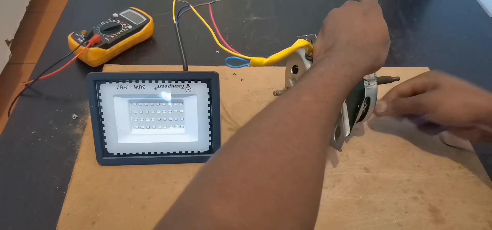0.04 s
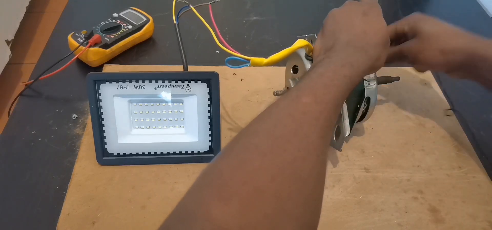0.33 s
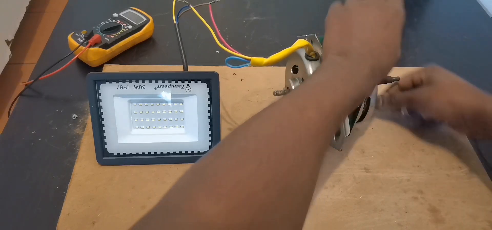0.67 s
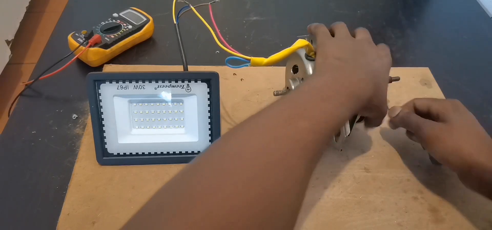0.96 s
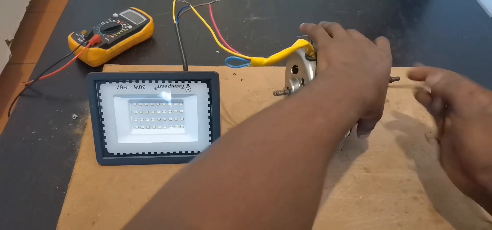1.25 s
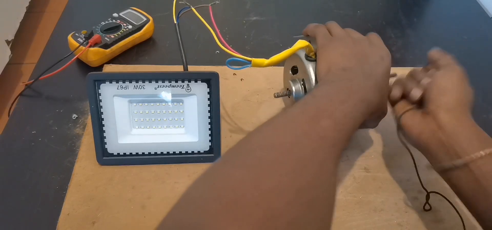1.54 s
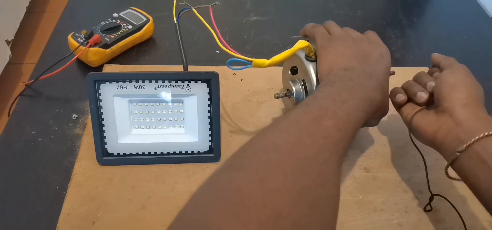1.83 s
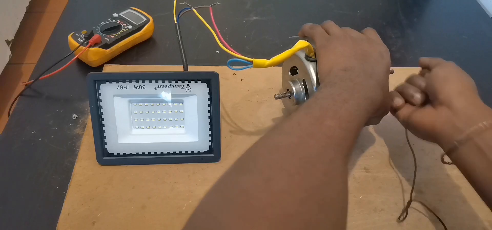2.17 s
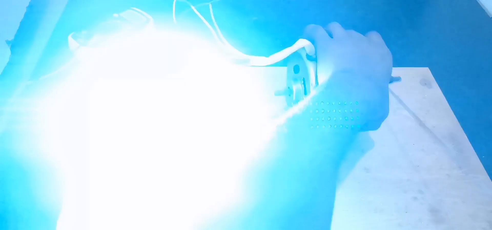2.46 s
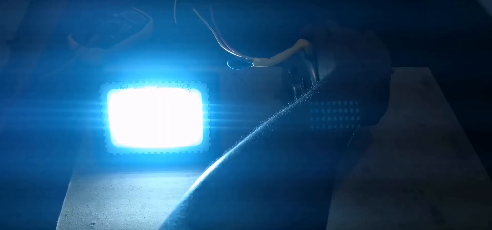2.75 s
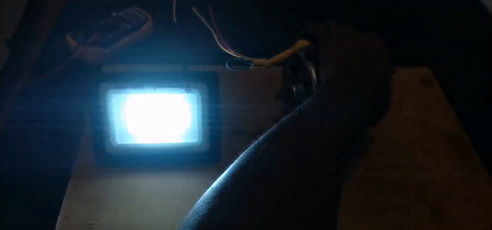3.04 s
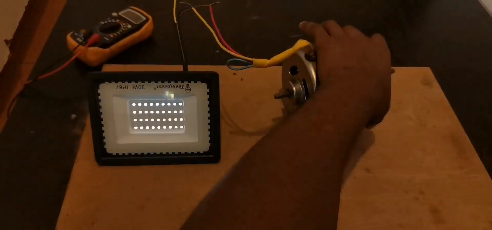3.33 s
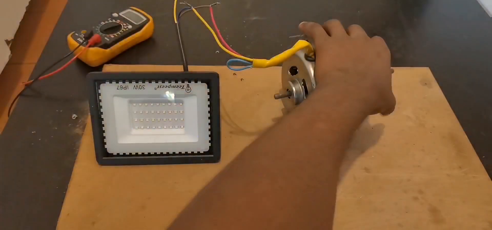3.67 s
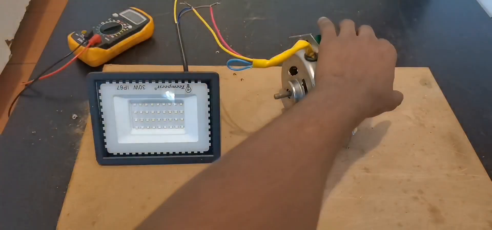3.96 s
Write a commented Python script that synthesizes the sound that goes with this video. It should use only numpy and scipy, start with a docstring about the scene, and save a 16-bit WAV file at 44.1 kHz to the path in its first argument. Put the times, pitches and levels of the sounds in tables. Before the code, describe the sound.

A small motor, spun by a yanked cord, whirs loudly and slowly loses speed.

```python
"""First come soft rubs, scuffs and bumps, close by: hands settle a small motor on a wooden bench
and wind a cord round its shaft. The cord ticks on the shaft and the motor rocks on its foot.
Then the cord is yanked: a knock as it snaps tight, drumming as it unwinds, a rasp as it comes off.
The motor spins on and slowly loses speed. Its dry bearings roar and whine through the housing
(its outer case), while the spinning rotor hums into the bench."""
import sys
import numpy as np
from scipy import signal
from scipy.fft import rfft, irfft
from scipy.io import wavfile

SR = 44100
rng = np.random.default_rng(int(sys.argv[2]) if len(sys.argv) > 2 else 0)


def inscribe(sig):
    """Save sig as 16-bit PCM at rate SR to the path in sys.argv[1].

    A 1-D sig is mono; a 2-D sig holds one channel per row.
    Samples are clipped to [-1, 1] before scaling.
    """
    pcm = np.round(np.clip(np.atleast_2d(sig).T, -1, 1) * 32767)
    wavfile.write(sys.argv[1], SR, pcm.astype(np.int16))


N = 176400
T, HZ = np.arange(N) / SR, np.fft.rfftfreq(N, 1 / SR)
PULL_S, FULL_SPEED_TURNS_PER_S = 2.304, 69

# A "colour" says how strong the low and high parts of a sound are, compared with each other.
# Quiet room background: frequency_hz, level_db
BACKGROUND_COLOUR = [(16, -24.5), (28, -1), (54, -16), (71, -7.5), (178, -14.5), (215, -11), (416, -23.5),
                     (514, -20.5), (635, -27), (827, -26), (896, -27.5), (1830, -33.5), (7300, -43.5),
                     (9500, -59), (12300, -54), (13300, -43)]
# Hand and cord rubbing on the housing: peak_s, rise_s, fall_s, level_db
RUBS = [(.07, 0.07, 0.066, -50.5), (.715, 0.052, 0.062, -58), (1.36, 0.036, 0.085, -65),
        (1.68, 0.056, 0.075, -64), (2.67, .08, 0.078, -36)]
# Their colour: frequency_hz, level_db
RUB_COLOUR = [(290, -34), (500, 5.5), (553, -9.5), (804, -6.5), (1170, -21), (1430, -10), (2510, -10),
              (3110, -11.5), (3440, -11.5), (5000, -12), (7270, -17), (9840, -35), (15600, -24)]
# Cord sliding through the fingers: peak_s, rise_s, fall_s, level_db
SLIDES = [(.28, 0.016, 0.032, -74), (.5, 0.064, 0.056, -71), (.8, 0.021, 0.042, -72),
          (1.25, 0.13, 0.21, -62), (1.32, .012, .03, -64), (2.38, 0.062, 0.033, -63.5)]
# Their colour: frequency_hz, level_db
SLIDE_COLOUR = [(1180, -44), (2000, -19), (3650, -15), (4600, 0), (5710, -3.5), (6550, 2), (7770, -3),
                (10100, -18.5), (13400, -11), (15600, -10)]
# Motor scuffing the bench: peak_s, rise_s, fall_s, level_db
SCUFFS = [(.01, 0.053, 0.059, -43), (.38, 0.032, 0.1, -59), (.67, 0.019, 0.073, -46),
          (1.32, 0.0092, 0.016, -52), (1.69, 0.052, .12, -47), (2.675, 0.053, 0.04, -29)]
# Their colour: frequency_hz, level_db
SCUFF_COLOUR = [(41, -28), (70, -4.5), (140, 3.5), (339, -10.5), (467, -4), (538, -14.5), (821, -13),
                (898, -27.5), (1160, -24.5), (1370, -64), (1500, -25), (1950, -37), (3300, -120)]
# Dull bumps through the bench: start_s, pitch_hz, level_db, fade_s (time to fall by 60 dB)
BUMPS = [(1.195, 114, -51, 0.087), (1.399, 70.8, -36, 0.25), (1.432, 64.6, -32.5, 0.16),
         (1.564, 76, -41.5, 0.34), (1.662, 130.2, -26, 0.13), (1.761, 119.7, -45, 0.55),
         (2.306, 132, -30.5, 0.37), (2.44, 93, -18.5, 0.094)]
# The side the bumps are heard on: time_s, left_minus_right_db
BUMP_SIDE = [(1.45, -26), (1.6, -3.5)]
# Cord ticking on the shaft: start_s, level_db
TICKS = [(1.503, -43), (1.5065, -54)]
# Tones that ring in a tick: pitch_hz, relative_db, fade_s
TICK_TONES = [(2130, -1, .012), (2430, 1, 0.011), (2880, -4, 0.009), (4400, 0.5, 0.015), (6530, 2, 0.0094),
              (6900, -1, .007)]
# Motor rocking on its foot: start_s, level_db
CLACKS = [(1.777, -49), (1.7797, -49), (1.787, -58)]
# Tones that ring in a clack: pitch_hz, relative_db, fade_s
CLACK_TONES = [(420, 4, .015), (870, -2, .022), (1610, -3.5, 0.023), (2080, -4, 0.02), (6140, -12, .025)]
# Knock of the cord snapping tight: frequency_hz, level_db
KNOCK_COLOUR = [(88, -31), (150, -10), (269, -12), (500, -7.5), (683, -20), (782, -4.5), (932, 3),
                (1110, -3.5), (1460, -24.5), (1950, -9.5), (2460, -21), (5050, -24), (6890, -38),
                (9780, -65), (15600, -61)]
# How fast the shaft spins: time_s, turns_per_s
SHAFT_SPEED = [(2.3, 2.53), (2.39, 18), (2.44, 31.5), (2.49, 37.5), (2.56, 51), (2.62, 67), (2.69, 65),
               (3.0, 60.4), (3.3, 52.2), (3.55, 45.7), (3.8, 40.3), (4.0, 36.2)]
# Rumble of the bench: frequency_hz, level_db
BENCH_COLOUR = [(59, -59), (100, -12), (187, -5), (270, 0.5), (303, 2.5), (368, -13.5), (437, -8.5),
                (510, -18), (700, -13.5), (910, -37), (1540, -120)]
# Roar of the bearings: frequency_hz, level_db
ROAR_COLOUR = [(290, -34), (500, -21.5), (759, -23.5), (792, -12.5), (942, -2.5), (1090, -5), (1260, -0.5),
               (1450, -12), (1750, -8), (2110, -6.5), (2370, -12), (4210, -8.5), (5000, -11), (5450, -19),
               (6390, -15), (8040, -31.5), (9560, -48.5), (12200, -47.5), (13300, -36.5), (15600, -37.5)]
# How each band of the roar follows the speed:
# top_hz, full_speed_relative_db, loss_per_speed_halving_db, dies_below_turns_per_s
ROAR_BANDS = [(1450, -27.5, -1.5, 26.5), (3030, -25.5, 1, 28.3), (5300, -23, 4, 33.1),
              (16000, -22.5, 6, 39.7)]
# Tones the housing rings at: pitch_hz, width_hz, gain_db, left_minus_right_db
HOUSING_TONES = [(820, 14, -3, 3), (952, 16, 2, 1), (1014, 12, 0, 2), (1078, 12, 0, 3), (1160, 28, 0, 3),
                 (1255, 22, 1, -3), (1304, 12, -1, -3), (1535, 16, 1, 0), (1734, 18, 2, -4),
                 (1900, 12, 0, 0), (2057, 16, 1, 2), (2182, 16, 1, 0), (4090, 70, -3, 0), (4700, 60, -3, 0),
                 (6240, 70, 1, 7)]
# Swells of the bearing whine: cycles_per_turn, relative_db, peak_s, spread_s
WHINE_SWELLS = [(43.6, -29, 2.495, 0.02), (20.23, -32.5, 2.99, 0.064), (20.9, -36.5, 3.31, 0.11),
                (25.2, -35, 3.44, 0.089), (22.64, -32, 3.72, 0.054), (22.3, -34.5, 3.96, 0.043),
                (30.1, -35, 3.756, 0.089), (44.2, -37, 3.05, 0.28), (41.9, -31.5, 3.28, 0.077),
                (43.76, -27.5, 3.53, 0.051), (43.86, -29.5, 3.86, 0.087), (44.8, -35.5, 3.84, .16),
                (54.5, -41, 3.82, 0.061), (66.7, -37.5, 3.78, .1), (67.8, -37, 3.49, .15)]
# Unwinding cord drumming the motor on the bench: peak_s, rise_s, fall_s, level_db
DRUMS = [(2.37, 0.015, .03, -25.5), (2.418, 0.039, 0.069, -27)]
# Their colour: frequency_hz, level_db
DRUM_COLOUR = [(71, -35), (120, -6), (188, -12), (291, -0.5), (378, -14), (451, -7.5), (571, -27),
               (900, -24), (1170, -57), (1980, -120)]
# Cord rasping off the shaft: peak_s, rise_s, fall_s, level_db
RASPS = [(2.45, 0.068, 0.037, -31.5), (2.535, 0.036, 0.028, -23.5), (2.57, 0.12, 0.13, -24.5)]
# Their colour: frequency_hz, level_db
RASP_COLOUR = [(600, -23.5), (900, -30), (1020, 0), (1140, 3), (1270, -3.5), (1420, -12), (1750, -21),
               (2300, -17), (5000, -45), (9000, -65)]
# Swells of the rotor's hum: cycles_per_turn, start_s, end_s, level_db
HUM_SWELLS = [(1, 2.58, 3.12, -35), (1, 3.12, 3.36, -40.5), (1, 3.36, 3.57, -46), (2, 2.64, 2.74, -37),
              (2, 2.4, 3.1, -43), (2, 2.92, 3.11, -31), (3, 3.43, 3.55, -45.5), (4, 3.0, 3.17, -38),
              (5, 3.22, 3.41, -38.5), (5, 3.78, 4.05, -44), (7.3, 3.66, 3.8, -41.5)]
# How alike the two microphones sound: frequency_hz, likeness (held within 0 to 0.99 when used)
MIC_LIKENESS = [(60, -0.2), (110, 1.5), (200, 0.37), (380, 1.16), (700, -0.15), (1290, 0.5762),
                (2380, 0.34), (4400, 0.5), (8120, 0.0), (15000, 0.5)]
# How far the left microphone's wave runs ahead: frequency_hz, lead_radians
MIC_LEAD = [(0, -1.5), (60, 0.2), (520, -0.01), (1290, 4), (2070, 0.33), (3360, -2.27), (4390, 0.0),
            (5080, 3.5), (5340, 3), (5860, 7.5), (8010, 13.5), (8960, 5), (11900, 3.5), (15300, 15)]
# Which microphone is louder: frequency_hz, left_minus_right_db
MIC_BALANCE = [(60, 4.5), (92, 3), (140, -2), (210, 0.5), (330, 2.5), (500, 0), (770, 5), (1170, 0.5),
               (1790, 1.5), (2740, 1.5), (4190, 0.5), (6410, 4), (9810, -4), (15000, 7.5)]


def amp(db):
    """Turns decibels into a number to multiply by."""
    return 10 ** (np.asarray(db) / 20)


def unit(x):
    """Scales a signal to an average (rms) size of 1."""
    return x / np.sqrt(np.mean(x ** 2) + 1e-20)


def over_time(rows):
    """Joins a table's points into one value for each sample."""
    return np.interp(T, *np.transpose(rows))


def over_frequency(rows):
    """Joins a table's points into one value for each frequency."""
    hz, values = np.transpose(rows)
    return np.interp(np.log(HZ + 1), np.log(hz + 1), values)


def low_pass(hz, steepness=12):
    """Gains that keep the frequencies below hz."""
    return 1 / (1 + (HZ / hz) ** steepness)


def wobble(hz):
    """A random wobble of average size 1, moving up to about hz times a second."""
    return unit(irfft(rfft(rng.standard_normal(N)) * low_pass(hz, steepness=4), N))


def stereo_noise(colour, source=None):
    """Colours two unrelated noises and blends them as the two microphones hear them."""
    first, second = rfft(rng.standard_normal((2, N)) if source is None else source)
    likeness = np.clip(over_frequency(MIC_LIKENESS), 0, .99)
    tilt = amp(over_frequency(MIC_BALANCE) / 2)
    lag = np.exp(-1j * over_frequency(MIC_LEAD))
    left = first * tilt
    right = (likeness * first + np.sqrt(1 - likeness ** 2) * second) * lag / tilt
    sum_size = np.sqrt(tilt ** 2 + tilt ** -2 + 2 * likeness * lag.real)
    both = irfft(np.array([left, right]) * amp(over_frequency(colour)) / sum_size, N)
    return both / both.mean(0).std()


def room(x, echo_db, fade_s):
    """Adds a short wash of echoes, different at each microphone."""
    t = T[:SR // 2]
    tail = rng.standard_normal((2, len(t))) * amp(-60 * t / fade_s) * (t > .004)
    tail /= np.linalg.norm(tail[0])
    both = x * np.ones((2, 1))
    return both + amp(echo_db) * signal.fftconvolve(both, tail, axes=1)[:, :N]


def friction(strokes, colour, grain_db):
    """Surfaces rub together: grainy noise that swells and fades with each stroke."""
    power = sum(amp(db) ** 2 * np.exp(-2 * ((T - peak) / np.where(T < peak, rise, fall)) ** 2)
                for peak, rise, fall, db in strokes)
    grains = rng.standard_normal((2, N)) * amp(grain_db * wobble(340))
    return stereo_noise(colour, grains) * np.sqrt(power)


def handling():
    """Hands rub the housing, the cord slides through the fingers and the motor scuffs the bench."""
    rubs = friction(RUBS, RUB_COLOUR, grain_db=1.5)
    slides = friction(SLIDES, SLIDE_COLOUR, grain_db=1)
    scuffs = friction(SCUFFS, SCUFF_COLOUR, grain_db=-1)
    return rubs + slides + scuffs


def bench_bumps(rise_s, blur):
    """Soft pushes make the bench thud: each is a low fading tone, blurred with noise."""
    out = np.zeros(N)
    for start, hz, db, fade_s in BUMPS:
        t = np.maximum(T - start, 0)
        thud = np.sin(2 * np.pi * hz * t) + blur * wobble(2 * hz)
        out += thud * amp(db - 60 * t / fade_s) * (1 - np.exp(-(t / rise_s) ** 2))
    return out * amp(np.outer([1, -1], over_time(BUMP_SIDE)) / 2)


def taps(hits, tones, rise_s, scratch):
    """Small hard things touch and ring briefly, with a scratchy edge."""
    out = np.zeros(N)
    for start, hit_db in hits:
        t = np.maximum(T - start, 0)
        ring = sum(np.sin(2 * np.pi * hz * t) * amp(db - 60 * t / fade_s) for hz, db, fade_s in tones)
        out += ring * amp(hit_db) * (1 + scratch * wobble(900)) * (1 - np.exp(-t / rise_s))
    return out


def cord_knock(crack_db, crack_fade_s, ring_db, ring_fade_s):
    """The cord snaps tight and jolts the motor: a quick crack and a longer ring."""
    t = np.maximum(T - PULL_S, 0)
    rise = 1 - np.exp(-t / .00068)
    fall = amp(crack_db - 60 * t / crack_fade_s) + amp(ring_db - 60 * t / ring_fade_s)
    return stereo_noise(KNOCK_COLOUR) * rise * fall


def bench_rumble(level_db):
    """The bench rumbles under the running motor."""
    fade_in = np.clip((T - PULL_S) / .033, 0, 1)
    return stereo_noise(BENCH_COLOUR) * amp(level_db) * fade_in


def housing(x, direct):
    """The housing rings at its own tones, many louder on one side; direct is what passes unchanged."""
    ringing = sum(amp(db + np.array([[side], [-side]]) / 2) / (1 + 2j * (HZ - hz) / width)
                  for hz, width, db, side in HOUSING_TONES)
    return irfft(rfft(x) * (direct + ringing), N)


def bearing_whine(speed, passes_per_turn):
    """Balls pass a worn spot in their track; the tones follow the speed and flare in the housing."""
    def tone(cycles_per_turn, jitter):
        pitch_hz = cycles_per_turn * speed * (1 + jitter * wobble(60))
        angle = 2 * np.pi * np.cumsum(pitch_hz) / SR + rng.uniform(0, 2 * np.pi)
        return np.sin(angle) * amp(1.9 * wobble(60))

    overtones = sum(tone(k * passes_per_turn, jitter=.014) * amp(-43 + 2.5 * wobble(4))
                    for k in range(5, 18))
    swells = sum(tone(cycles, jitter=.011) * amp(db) * np.exp(-.5 * ((T - peak) / spread) ** 2)
                 for cycles, db, peak, spread in WHINE_SWELLS)
    whine = housing(overtones * speed / FULL_SPEED_TURNS_PER_S + swells, direct=1)
    return room(whine, echo_db=-8, fade_s=.17) * (T > PULL_S)


def cord_unwinding():
    """The cord drums the motor on the bench as it unwinds, then rasps off the shaft."""
    return friction(DRUMS, DRUM_COLOUR, grain_db=2.5) + friction(RASPS, RASP_COLOUR, grain_db=-1)


def bearing_roar(speed, full_speed_hits_per_s, ring_db, direct):
    """Countless tiny hits of the balls, with the housing ringing; faster is louder and brighter."""
    speed_share = speed / FULL_SPEED_TURNS_PER_S
    hits_per_s = full_speed_hits_per_s * speed_share
    hits = rng.standard_normal((2, N)) * amp(-.5 * np.minimum(rng.exponential(1, N), 3))
    hits *= rng.random(N) < hits_per_s / SR
    once_a_turn = 1 + .1 * np.cos(2 * np.pi * np.cumsum(speed) / SR)
    hits *= once_a_turn * amp(.53 * wobble(39)) / np.sqrt(hits_per_s)
    rattle = direct * stereo_noise(ROAR_COLOUR, hits)
    ring = amp(ring_db) * unit(housing(stereo_noise(ROAR_COLOUR), direct=0))
    spectrum = rfft(unit(room(rattle + ring, echo_db=-5.5, fade_s=.11)))
    out, lower_bands = 0, 0
    for top_hz, db, loss_db, dies_below in ROAR_BANDS:
        level = amp(db + loss_db * np.log2(speed_share)) / np.sqrt(1 + (dies_below / speed) ** 8)
        out += irfft(spectrum * (low_pass(top_hz) - lower_bands), N) * level
        lower_bands = low_pass(top_hz)
    return out * amp(2.5) * (T > PULL_S)


def rotor_hum(speed, edge_s):
    """The rotor shakes the bench at low multiples of its speed, each swelling for a while."""
    angle = 2 * np.pi * np.cumsum(speed * (1 + .025 * wobble(21))) / SR
    tones = np.zeros(N)
    for cycles, start, end, db in HUM_SWELLS:
        swell = (np.tanh((T - start) / edge_s) - np.tanh((T - end) / edge_s)) / 2
        tones += np.sqrt(2) * amp(db) * swell * np.sin(cycles * angle)
    return room(tones * amp(2 * wobble(30)), echo_db=-14, fade_s=.15)


def scene():
    """Handling, the pull and the coasting motor, over a quiet room."""
    speed = over_time(SHAFT_SPEED)
    hands = handling() + bench_bumps(rise_s=.0087, blur=.54)
    pull = cord_knock(crack_db=-27.5, crack_fade_s=.026, ring_db=-30.5, ring_fade_s=.33)
    pull += cord_unwinding()
    motor = bearing_roar(speed, full_speed_hits_per_s=7000, ring_db=-4, direct=.78)
    motor += bearing_whine(speed, passes_per_turn=4.2)
    motor += rotor_hum(speed, edge_s=.02) + bench_rumble(level_db=-42)
    ticks = taps(TICKS, TICK_TONES, rise_s=.00035, scratch=.46)
    clacks = taps(CLACKS, CLACK_TONES, rise_s=.0003, scratch=.3)
    clicks = room(ticks + clacks, echo_db=-3, fade_s=.18)
    background = stereo_noise(BACKGROUND_COLOUR) * amp(-58)
    return background + hands + clicks + pull + motor


def record(dry):
    """Cuts away the very highest treble, above 15760 Hz."""
    treble_cut = signal.firwin(801, 15760, window=("kaiser", 10), fs=SR)
    return signal.oaconvolve(dry, treble_cut[None], "same")


dry = scene()
out = record(dry)
inscribe(out)
```